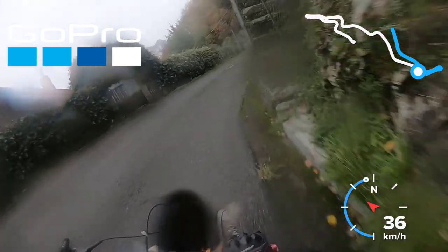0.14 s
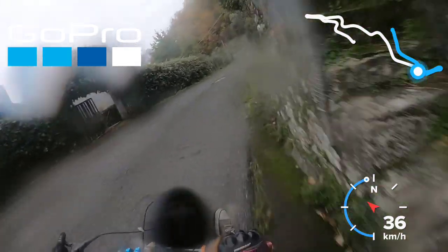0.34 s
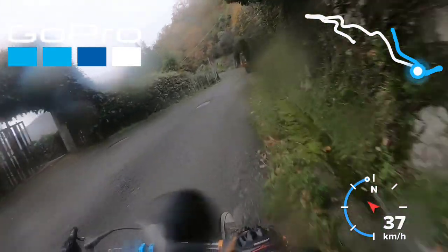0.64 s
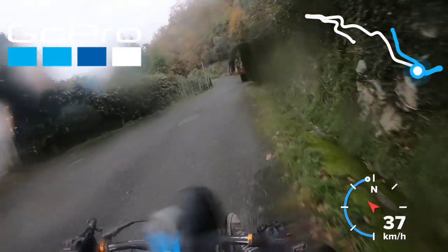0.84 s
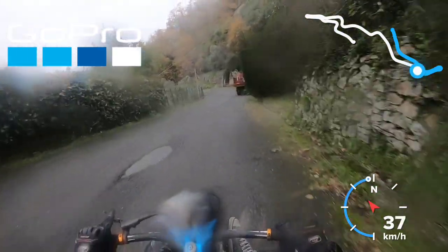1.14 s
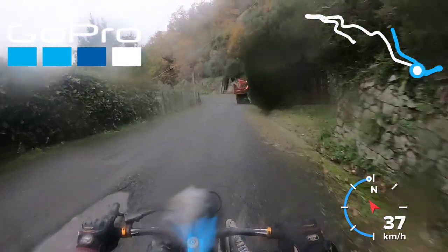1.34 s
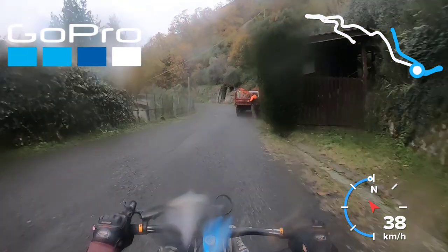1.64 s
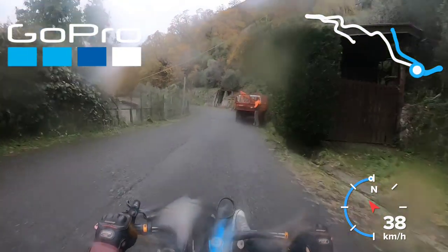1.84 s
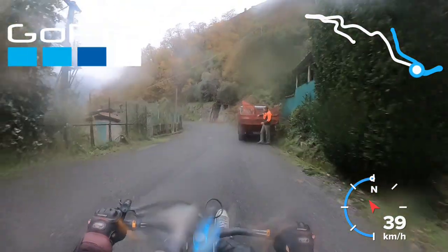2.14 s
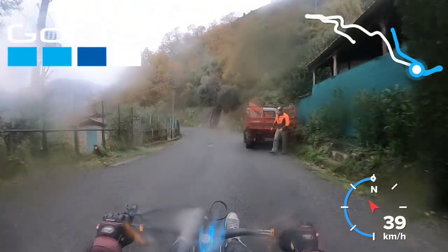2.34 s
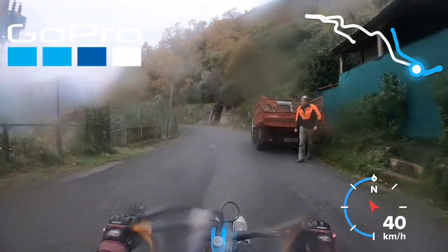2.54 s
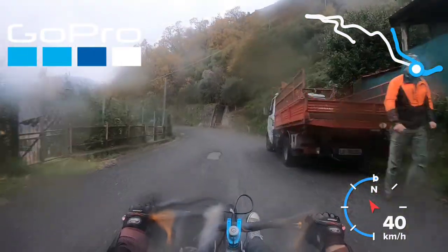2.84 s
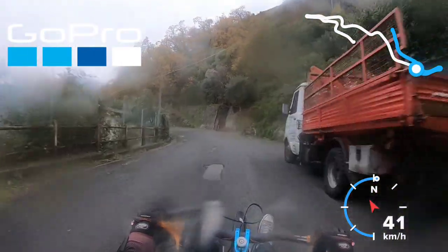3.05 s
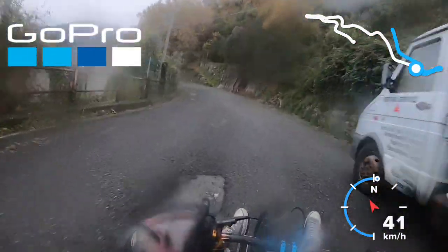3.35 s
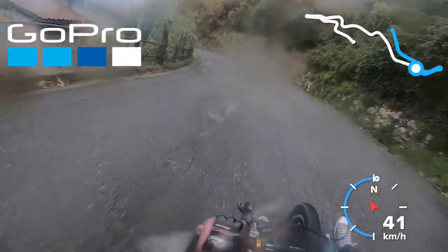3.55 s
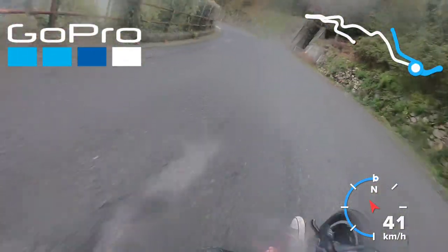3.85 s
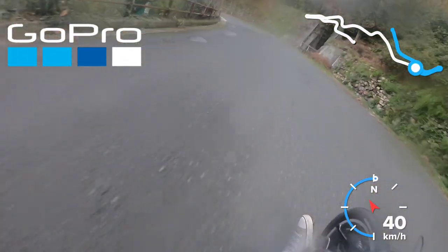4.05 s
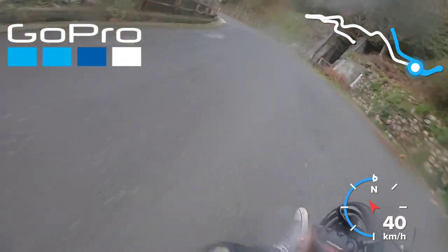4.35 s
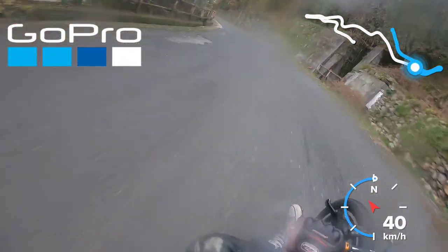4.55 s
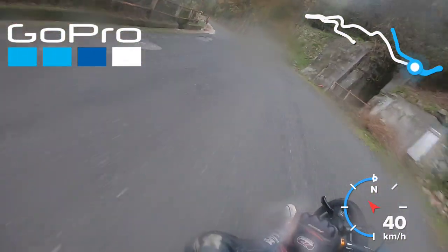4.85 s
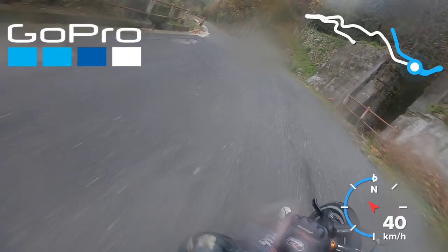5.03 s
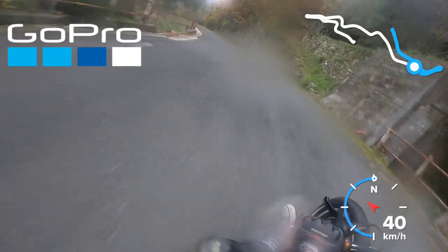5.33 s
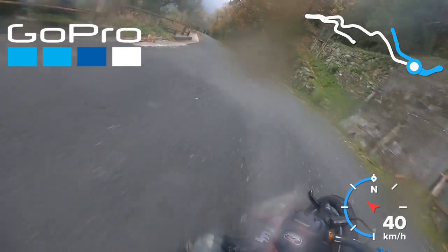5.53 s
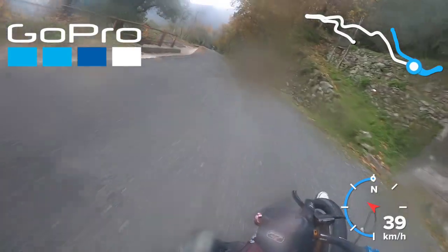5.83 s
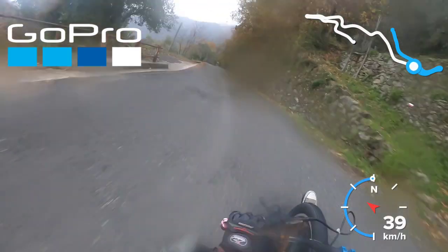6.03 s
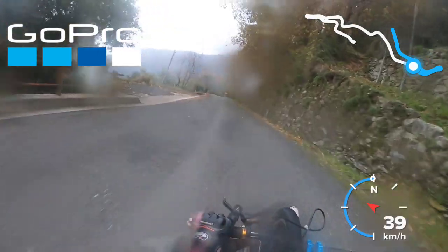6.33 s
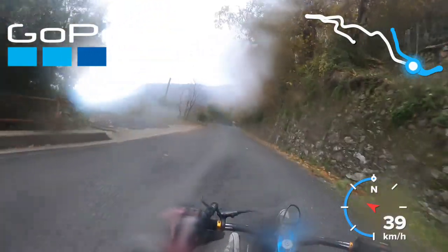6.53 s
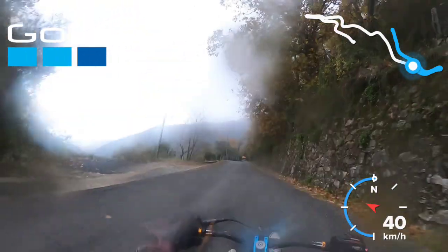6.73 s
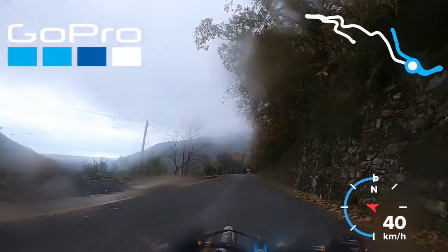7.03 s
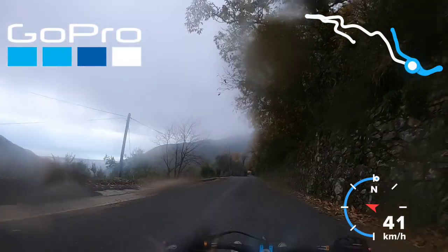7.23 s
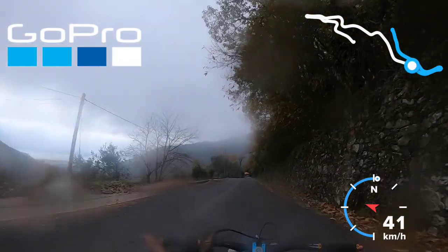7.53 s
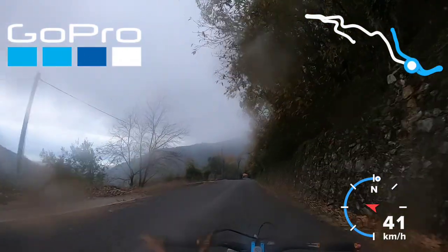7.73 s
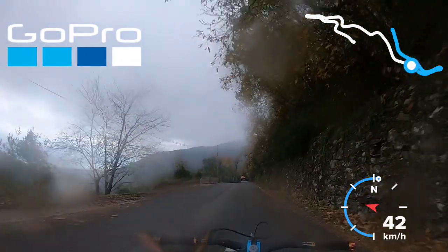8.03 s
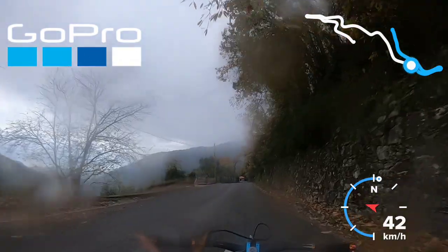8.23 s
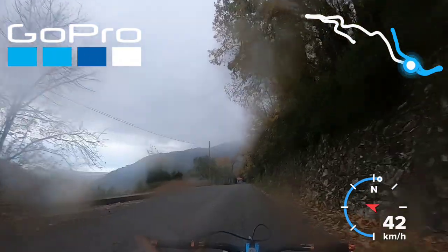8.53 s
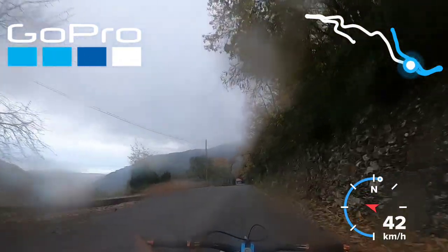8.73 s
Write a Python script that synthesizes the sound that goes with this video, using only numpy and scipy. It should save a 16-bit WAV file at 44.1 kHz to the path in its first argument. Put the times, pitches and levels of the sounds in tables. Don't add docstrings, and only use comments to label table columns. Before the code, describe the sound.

A small trike coasts down a wet paved road, with deep shaking rumble, wind pressure, muffled tyre roar, and light spray hiss and ticks.

```python
import sys
import numpy as np
from scipy import signal
from scipy.io import wavfile

SR = 44100
rng = np.random.default_rng(int(sys.argv[2]) if len(sys.argv) > 2 else 0)


def wrap_up_sound(samples):
    columns = np.atleast_2d(samples).T
    tamed = np.clip(columns, -1, 1)
    steps = np.round(tamed * 32767).astype(np.int16)
    wavfile.write(sys.argv[1], SR, steps)


def invert_db(x):
    u = np.asarray(x, float) / 20
    return 10 ** u


N = 391608
CONTROL_STEP = 64


def clock():
    return np.arange(0, N + CONTROL_STEP, CONTROL_STEP) / SR


def each_sample(*controls):
    return [np.interp(np.arange(N) / SR, clock(), control) for control in controls]


def in_time(rows):
    s, *columns = np.transpose(rows)
    return [np.interp(clock(), s, column) for column in columns]


def bell(s, half_s):
    return np.exp(-0.5 * ((clock() - s) / max(half_s, 0.005)) ** 2)


def follow(law, ride):
    calm_db, *shares = law
    return calm_db + sum(share * control for share, control in zip(shares, ride))


def swelled(calm_db, rows):
    swells = sum(invert_db(db) * bell(s, half_s) for s, db, half_s, *rest in rows)
    return 20 * np.log10(invert_db(calm_db) + swells)


def rms_one(x):
    return x / np.sqrt(np.mean(x ** 2) + 1e-20)


def drift(rate):
    r = np.exp(-40 * np.pi * rate / SR)
    noise = rng.standard_normal(N // 20 + 2002)
    slow = signal.lfilter([1], [1, -2 * r, r * r], noise)[2000:]
    return np.interp(np.arange(N) / 20, np.arange(len(slow)), rms_one(slow))


def resonance(x, hz, width_hz):
    r = np.exp(-np.pi * width_hz / SR)
    feedback = [1, -2 * r * np.cos(2 * np.pi * hz / SR), r * r]
    return signal.lfilter([(1 - r * r) / 2, 0, (r * r - 1) / 2], feedback, x)


def body(x, peaks):
    rings = [invert_db(db) * resonance(x, hz, width_hz) for hz, width_hz, db in peaks]
    return rms_one(sum((-1) ** k * ring for k, ring in enumerate(rings)))


def band(x, low_hz, high_hz):
    return signal.sosfilt(signal.butter(2, [low_hz, high_hz], "band", fs=SR, output="sos"), x)


def coloured(spectrum, patchy_db):
    hz, db = np.transpose(spectrum)
    edges = hz[0] * 2 ** np.arange(0, np.log2(hz[-1] / hz[0]) + 1 / 3, 1 / 3)
    white, out = rng.standard_normal((2, N)), 0
    for k, (low, high) in enumerate(zip(edges, edges[1:])):
        level_db = np.interp(np.log(low * high) / 2, np.log(hz), db)
        out = out + invert_db(level_db + patchy_db * drift(12)) * band(white[k % 2], low, high)
    return rms_one(out)


def grains(per_s, spread_db):
    sizes = invert_db(spread_db * np.minimum(rng.exponential(1, N), 5)) * rng.choice([-1, 1], N)
    return sizes * (rng.random(N) < per_s / SR) + 1e-18


def mount_swing(ride):
    # level/dB, trembling, slide, load
    mount_law = (-45.5, 1.0624, -0.0832, 0.6046)
    # t/s, peak level/dB, half length/s, pitch f/Hz
    swings = [(0.354, -48.5, 0.21, 52.75), (0.629, -44.5, 0.032, 50.01), (1.33, -44, 0.0327, 52.28),
              (1.499, -47, 0.043, 48.72), (1.758, -40, 0.032, 49.86), (2.122, -37, 0.043, 58.58),
              (2.401, -41, 0.13, 57.05), (2.6, -39.5, 0.029, 53.92), (2.799, -40.5, 0.0324, 51.98),
              (3.017, -29, 0.081, 51.91), (3.209, -41, 0.036, 53.17), (3.538, -45.5, .04, 46.89),
              (3.651, -42.5, .03, 46.99), (3.841, -39, 0.0325, 50.03), (4.253, -32.5, 0.0375, 50.47),
              (4.603, -46, 0.155, 51.49), (5.4, -43, 0.28, 50.96), (5.822, -30, 0.0455, 50.03),
              (6.119, -35.5, 0.043, 52.05), (6.857, -36.5, 0.065, 50.98), (7.003, -31.5, 0.124, 53.63),
              (7.212, -37, 0.026, 50.79), (7.3, -31, 0.033, 55.05), (7.499, -40.5, 0.091, 56.04),
              (7.6, -34, 0.025, 51.04), (7.77, -28, 0.0343, 53.93), (8.076, -27, 0.0365, 53.96),
              (8.371, -28.5, 0.043, 54.03), (8.569, -27.5, 0.091, 52), (8.798, -30, 0.057, 51.02)]
    # t/s, change of level/dB
    lulls = [(.03, -17), (.52, -11), (.73, -5.5), (.9, 1), (1.01, -12.5), (1.42, -13.5), (1.61, -11.5),
             (1.83, -7.5), (2.2, -6), (2.52, -10.5), (2.76, -6), (2.86, -5.5), (3.28, -8.5), (3.44, -10),
             (3.6, -9.5), (3.75, -8.5), (3.99, -12), (4.17, -11.5), (4.32, -6), (4.64, -8), (4.9, -15.5),
             (5.25, -8.5), (5.92, -10), (6.39, -14), (6.68, -14), (7.08, -7), (7.37, -7), (7.9, 3),
             (8.44, -6.5), (8.68, -11)]
    lulls_db = sum(db * bell(s, 0.02085) for s, db in lulls)
    control_db = swelled(follow(mount_law, ride), swings) + lulls_db
    pitch_hz, level_db = each_sample(in_time(swings)[-1], control_db)
    phase = 2 * np.pi * np.cumsum(pitch_hz + 3.483 * drift(19.83)) / SR
    return phase - phase[-1] - np.pi / 5, level_db


def shake(phase, level_db):
    swing = np.sin(phase) + invert_db(-21.5) * np.sin(2 * phase + 0.29) + invert_db(-25.5) * np.sin(3 * phase)
    sway_hz, sway_width_hz = 60.72, 13
    sway = resonance(rng.standard_normal(N + SR), sway_hz, sway_width_hz)
    sway = resonance(sway, sway_hz, 33)[SR:]
    return invert_db(level_db + 1.3 * drift(11.8)) * (np.sqrt(2) * swing + invert_db(-7) * rms_one(sway))


def rumble(ride):
    # f/Hz, width/Hz, level/dB
    seat_peaks = [(75.6, 30, -1), (110.8, 10, 0.5), (131.4, 44, -5)]
    tube_peaks = [(166.19, 11, 2.5), (193.45, 33.2, -2.5), (221.56, 34.2, -7)]
    hub_peaks = [(262.87, 46.9, -1), (320.07, 37.63, 1), (362.2, 40.9, -8)]
    # level/dB, trembling, slide, load
    seat_law = (-49, 0.306, 0.0438, .5)
    tubes_law = (-48, -0.11, -0.0072, 1.0849)
    hubs_law = (-51.5, -0.5383, 0.7572, 0.18)
    # t/s, then change of seat, tubes, hubs level/dB
    bumps = [(.03, 4.5, 5, -7.5), (.55, 2, 1.5, 3.5), (1.68, -0.5, 0, -2), (2.52, 0, -5.5, -4.5),
             (2.69, -1.5, 10, 3), (3.0, -6, -2.5, 1.5), (3.71, 3, 1.5, 7), (3.81, 1, 0, -9),
             (4.07, 7.5, 5.5, 0), (4.17, -6, -3.5, -1.5), (4.23, 7.5, 1.5, 5.5), (4.8, 6.5, 1, -2),
             (4.98, 7, -1, -2.5), (5.1, 7, 2, 1.5), (5.24, 6, 6.5, 0), (5.5, 0, -4.5, 1),
             (5.6, 5.5, 4, 2.5), (5.75, 5.5, -0.5, -1), (5.89, 2.5, 0.5, 3.5), (6.09, -3, 2.5, 4.5),
             (6.23, -3.5, -8, -3), (6.8, 0.5, 6.5, -2.5), (6.9, 12, -7, 5.5), (7.201, 7.5, 1.5, -0.5),
             (7.57, 7, 1.5, -0.5), (7.72, 5.5, -3, 4), (8.06, 7.5, 6, -4.5), (8.3, -6.5, 1.5, 4),
             (8.44, 7.5, 3.5, 1.5), (8.52, 7, 2, 5)]
    bumps_db = sum(np.outer(db, bell(s, 0.0334)) for s, *db in bumps)
    laws = (seat_law, tubes_law, hubs_law)
    frame_db = [follow(law, ride) + db for law, db in zip(laws, bumps_db)]
    seat_db, tubes_db, hubs_db = each_sample(*frame_db)
    jolts = [grains(1200, spread_db=2.0) * invert_db(1.385 * drift(9)) for part in range(3)]
    seat = invert_db(seat_db) * rms_one(band(body(jolts[0], seat_peaks), 70, 146.1))
    tubes = invert_db(tubes_db) * rms_one(band(body(jolts[1], tube_peaks), 125, 250))
    hubs = invert_db(hubs_db) * rms_one(band(body(jolts[2], hub_peaks), 220, 474))
    return seat + tubes + hubs


def wind(ride):
    # level/dB, trembling, slide, load
    wind_law = (-47, 0.8358, -0.03, 0.1346)
    # t/s, peak level/dB, half length/s
    gusts = [(0.059, -49, 0.0333), (0.218, -44.5, 0.093), (1.442, -49, 0.048), (1.648, -43.5, 0.033),
             (2.254, -43.5, 0.081), (2.66, -43, 0.054), (3.15, -43, 0.16), (3.66, -46.5, 0.087),
             (4.2, -40.5, 0.276), (4.245, -45, .03), (5.303, -51, .06), (5.87, -42, 0.071),
             (6.399, -45, 0.057), (6.6, -43, 0.0504), (7.348, -41, 0.136), (7.69, -41.5, 0.059),
             (8.3, -47, 0.205)]
    level_db, = each_sample(swelled(follow(wind_law, ride), gusts))
    return invert_db(level_db) * rms_one(band(rng.standard_normal(N + SR), 12.67, 46)[SR:])


def roar(ride):
    # f/Hz, level/dB per Hz
    roar_spectrum = [(210, -37.5), (350, -8), (382, -3), (682, -12.5), (744, -13.5), (1200, -22),
                     (1400, -29.5), (1820, -54), (3080, -120)]
    # level/dB, trembling, slide, load
    roar_law = (-60.5, 0.13, 0.75, 0.0947)
    lid_law = (-75, 0.7944, .2, -0.33)
    # t/s, peak level/dB, half length/s
    lid_swells = [
        (.1, -71.5, 0.153),
        (0.549, -68.5, 0.212),
        (1.3, -77, 0.102),
        (1.85, -70, 0.178),
        (2.25, -77.5, .08),
        (3.98, -73, .2),
        (6.098, -75.5, .4),
        (7.301, -68.5, .3),
        (8.301, -68.5, 0.342),
        (8.801, -69, 0.22),
    ]
    lid_control_db = swelled(follow(lid_law, ride), lid_swells)
    level_db, lid_db = each_sample(follow(roar_law, ride), lid_control_db)
    lid_hz, lid_width_hz = 721, 32
    lid = resonance(rng.standard_normal(N), lid_hz, lid_width_hz)
    lid = resonance(lid, lid_hz, 4 * lid_width_hz)
    tyres = invert_db(level_db + 0.5) * coloured(roar_spectrum, patchy_db=1.63)
    return tyres + invert_db(lid_db + 1.41) * rms_one(lid)


def buzz(phase, ride):
    # f/Hz, width/Hz, level/dB
    wall_peaks = [(1018.6, 130, 0.6), (1569, 202.6, 0.04), (2209, 267, -0.99), (2942, 660, -14)]
    latch_peaks = [(3274, 600, -3), (3876.5, 330, -0.03), (4680, 590, -15)]
    # level/dB, trembling, slide, load
    walls_law = (-69.5, 1.0032, -0.1384, -0.0122)
    latch_law = (-80, 1.5318, 0.2462, -0.0936)
    # t/s, change of level/dB, half length/s
    rattles = [(0.069, 4, 0.034), (.3, 2.5, 0.066), (0.839, 3, 0.0146), (0.888, 4, 0.0096), (1.086, 1, .02),
               (1.237, 2, 0.0294), (1.687, 2.5, 0.025), (3.19, -2, 0.035), (3.482, 5, 0.0247),
               (3.712, 2.5, .015), (4.293, 2.5, 0.0172), (5.83, 3, 0.035), (6.084, 1.5, 0.026),
               (7.05, 1.5, 0.016), (7.771, 2, .04), (8.194, 1, .04), (8.462, 1, .03), (8.531, -1.5, 0.022),
               (8.579, 3.5, 0.016), (8.758, 2.5, 0.018)]
    rattle_db = sum(db * bell(s, half_s) for s, db, half_s in rattles)
    walls_db, latch_db = each_sample(follow(walls_law, ride) + rattle_db,
                                     follow(latch_law, ride) + 1.5 * rattle_db)
    chatter = rms_one(grains(5000, spread_db=3.5)) + 0.8 * rng.standard_normal((2, N))
    chatter = chatter * invert_db(0.76 * np.cos(phase) + 0.42 * drift(10) + 0.54 * drift(40))
    walls = band(body(chatter[0], wall_peaks), 800, 3300)
    latch = band(body(chatter[1], latch_peaks), 2900, 6200)
    return invert_db(walls_db) * walls + invert_db(latch_db) * latch


def spray(ride):
    # f/Hz, level/dB per Hz
    hiss_spectrum = [(2650, 5.5), (3300, 5), (4200, 3), (5300, -0.08), (6500, -4.5), (7800, -9.5),
                     (8600, -20.5)]
    # level/dB, trembling, slide, load
    hiss_law = (-77.5, -0.0028, 0.1729, 0.06)
    # t/s, peak level/dB, half length/s
    wet_stretches = [
        (.65, -99.5, 0.37),
        (1.498, -100, 0.45),
        (2.801, -104, .5),
        (3.8, -94.5, .15),
        (4.601, -99.5, 0.55),
        (5.598, -99, .5),
        (6.2, -100, 0.22),
    ]
    # t/s, peak level/dB, dull part level/dB
    drops = [(0.0639, -72, -2.5), (0.0943, -71, 0), (0.3621, -59.5, -4.5), (0.88, -67.5, 16.5),
             (1.1703, -66.5, -4.5), (1.932, -65, -5.5), (2.1392, -64, -18.5), (2.5272, -61.5, -1),
             (3.0415, -70, 7), (3.057, -57.5, 2.5), (3.1985, -67.5, 0.5), (3.6635, -66, -6),
             (4.3194, -68, 0.5), (4.4703, -69, 5), (4.5, -60.5, -5), (4.5761, -68, -5.5),
             (4.589, -66.5, -0.5), (4.722, -68.5, -4), (4.9971, -66.5, 0), (5.3486, -64, -6.5),
             (5.6922, -67.5, -5.5), (5.903, -65.5, -4.5), (6.1274, -70.5, 2), (6.3681, -67.5, -4.5),
             (6.4104, -69.5, 3), (6.761, -70, -2.5), (6.9967, -69.5, 10.5), (7.696, -66.5, 2.5),
             (7.812, -66.5, 2), (8.77, -72, 7)]
    hiss_db, mist_db = each_sample(follow(hiss_law, ride), swelled(-108, wet_stretches))
    hiss = coloured(hiss_spectrum, patchy_db=0.32) * invert_db(0.8 * drift(22))
    mist = band(band(rng.standard_normal(N), 7800, 9200), 7000, 9700)
    mist = rms_one(mist) * invert_db(3.0 * drift(9))
    small = rms_one(band(grains(78, spread_db=3.0), 4300, 8900))
    s, peak_db, dull_db = np.transpose(drops)
    at = np.round(s * SR).astype(int)
    bright, dull = np.zeros((2, N)) + 1e-18
    bright[at] = invert_db(peak_db + 16)
    dull[at] = invert_db(peak_db + dull_db + 11.5)
    ticks = band(bright, 4400, 11000) + resonance(dull, 3900, 800)
    return invert_db(hiss_db) * (hiss + invert_db(-17.0) * small) + invert_db(mist_db) * mist + ticks


def rubs():
    # t/s, level/dB, time to fade 60 dB/s
    rub_times = [(.28, -72.5, 3), (.548, -75.5, 0.55), (.59, -74, 0.43), (.735, -72, 0.88),
                 (.82, -69, 0.03), (.878, -75.5, 0.65), (2.72, -76, 1.65), (3.3, -73.5, 2.5),
                 (3.473, -65, 1.3), (3.7, -72, 0.7), (5.81, -64.5, 0.09)]
    # f/Hz, width/Hz, level/dB
    bracket_peaks = [(1632, 130, 6.5), (3915, 280, 1.5), (4780, 400, -5.5), (6500, 2400, -19)]
    t = np.arange(N) / SR
    pressure = sum(invert_db(db - 60 * np.abs(t - s) / fade_s) * (t >= s) for s, db, fade_s in rub_times)
    return pressure * body(grains(6600, spread_db=2.5), bracket_peaks)


def scene():
    # t/s, then trembling of the case, sideways slide of the wheels,
    # load on the frame, each as level/dB
    ride_changes = [(0.0, -1.5, 1.5, 0.5), (.6, 3.5, 1.5, 0), (.9, 1, 3, 0.73), (1.3, -0.5, -3.5, -5),
                    (1.7, 2, 0, 1), (2.5, 3, -2, -1), (3.05, 6.5, 0.5, 1), (3.3, 5, -0.5, 1.5),
                    (3.6, 6.5, 3, 6), (4.1, 2, 6.5, 3), (4.75, 0, 2, 8.5), (5.4, 0, 2, -0.17),
                    (5.85, 1, 2.5, 3), (6.3, -2, -1.5, 2.5), (6.65, 1.45, 0, 1), (7.0, 5, 0, 4),
                    (8.3, 8, 1.5, 0.83), (8.88, 6, 3, 2)]
    ride = in_time(ride_changes)
    phase, shake_db = mount_swing(ride)
    low = shake(phase, shake_db) + rumble(ride) + wind(ride)
    return (low + roar(ride) + buzz(phase, ride) + spray(ride) + rubs())[None]


def band_limit(x):
    return signal.sosfilt(signal.butter(12, 10500, fs=SR, output="sos"), x)


def record(dry):
    overload = 0.1212
    rounded = dry / (1 + (dry / overload) ** 4) ** (1 / 4)
    return band_limit(rounded)


dry = scene()
out = record(dry)
wrap_up_sound(out)
```